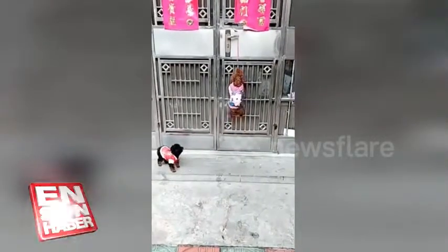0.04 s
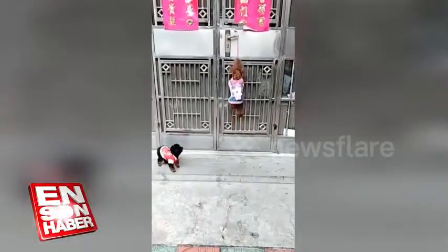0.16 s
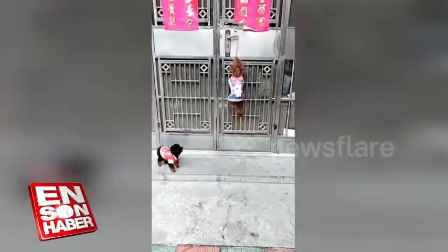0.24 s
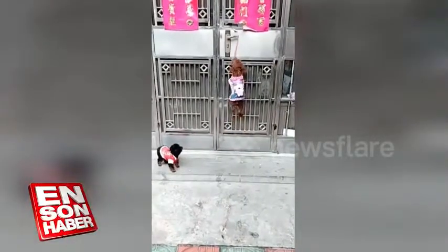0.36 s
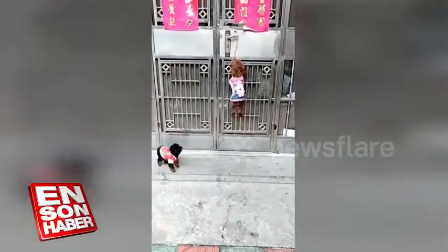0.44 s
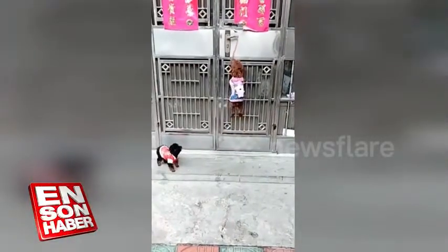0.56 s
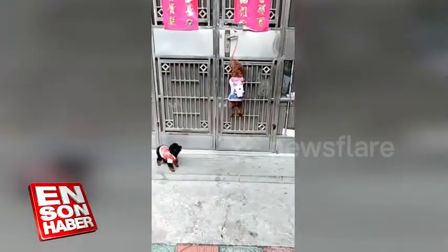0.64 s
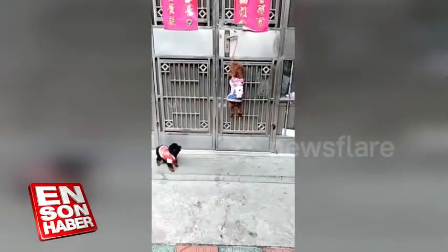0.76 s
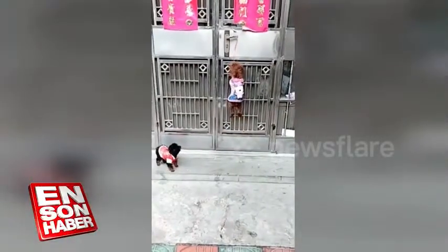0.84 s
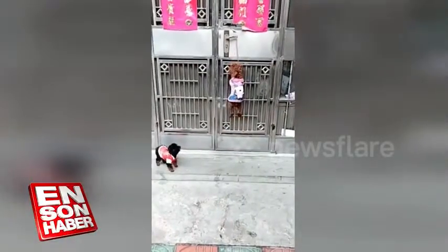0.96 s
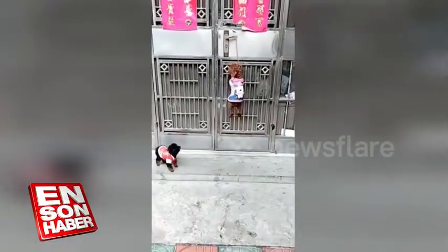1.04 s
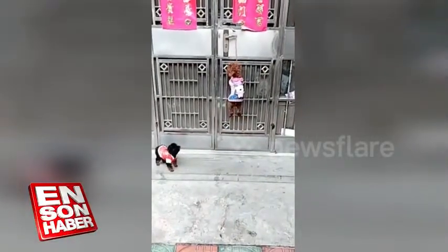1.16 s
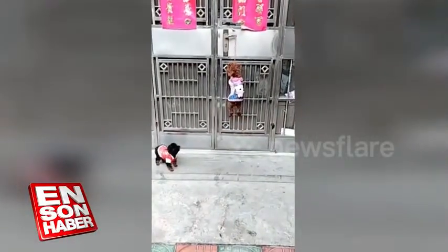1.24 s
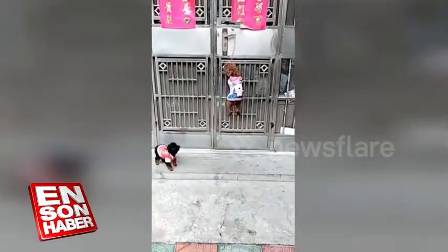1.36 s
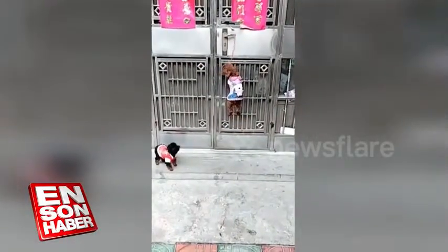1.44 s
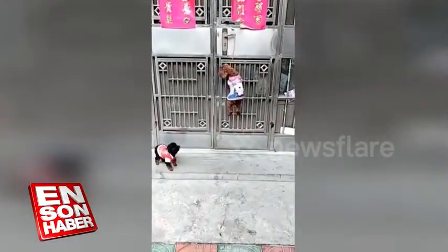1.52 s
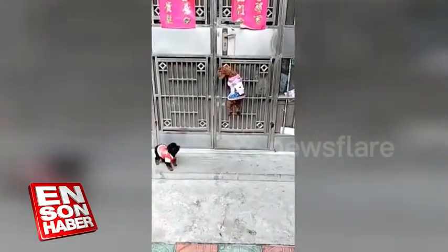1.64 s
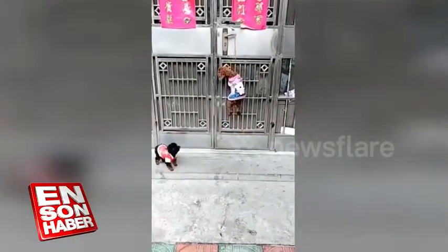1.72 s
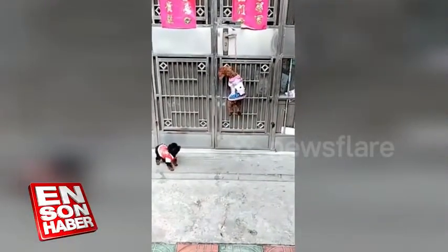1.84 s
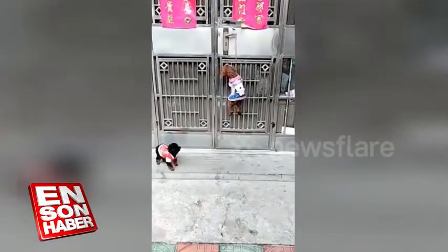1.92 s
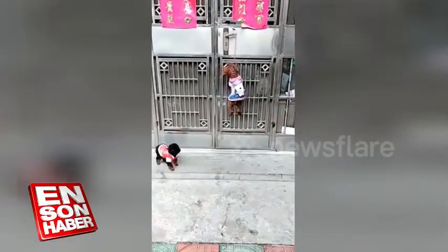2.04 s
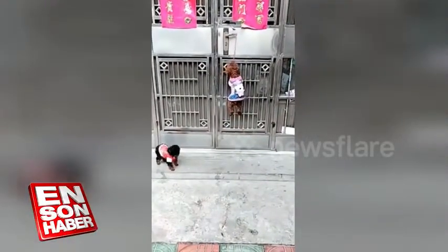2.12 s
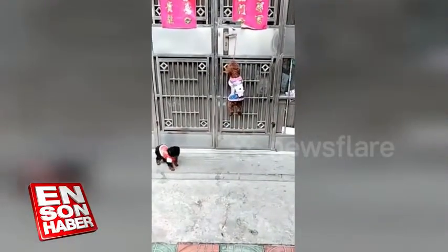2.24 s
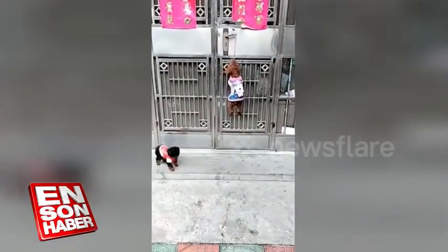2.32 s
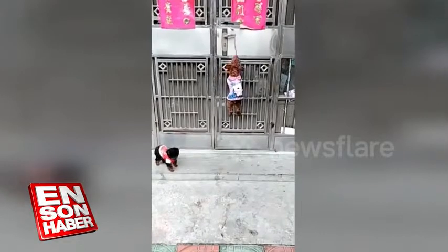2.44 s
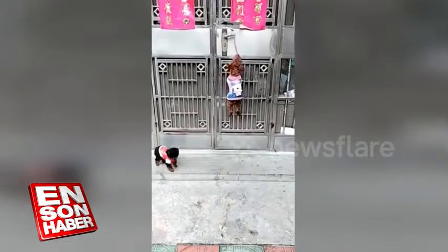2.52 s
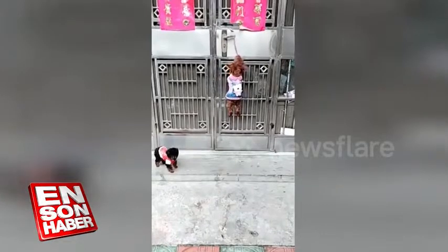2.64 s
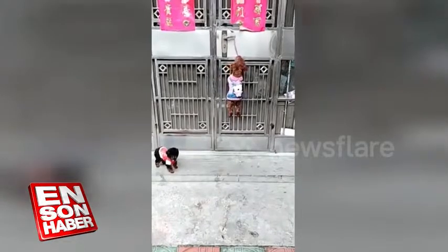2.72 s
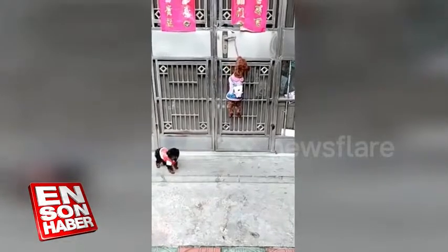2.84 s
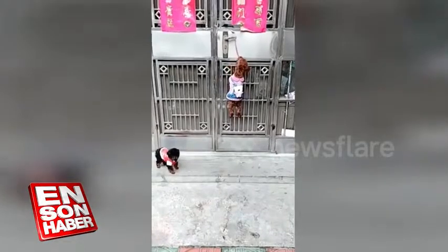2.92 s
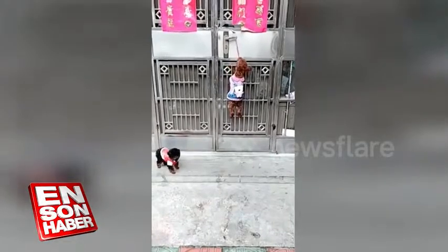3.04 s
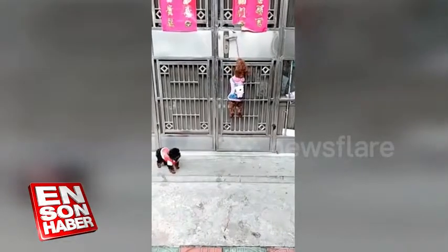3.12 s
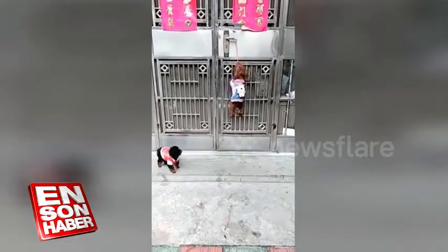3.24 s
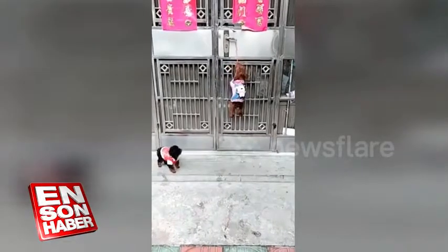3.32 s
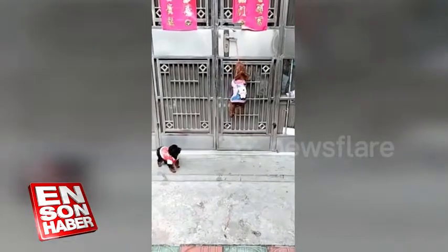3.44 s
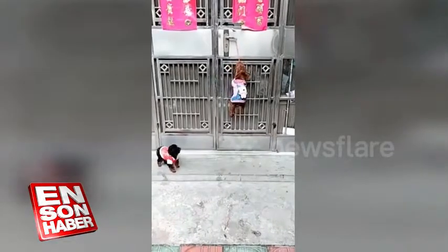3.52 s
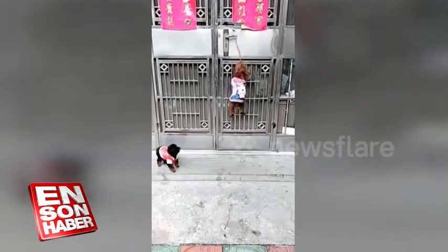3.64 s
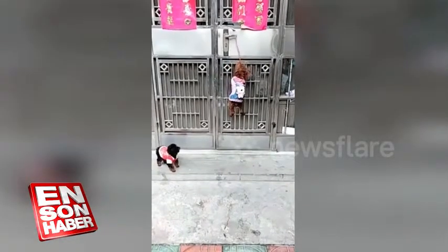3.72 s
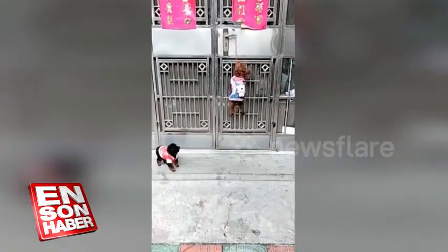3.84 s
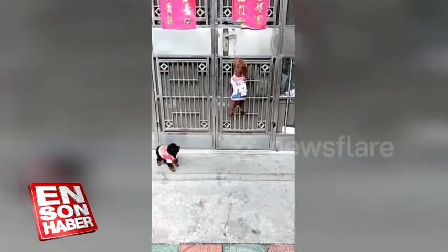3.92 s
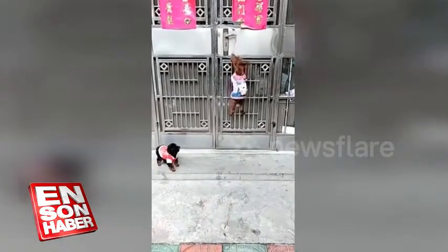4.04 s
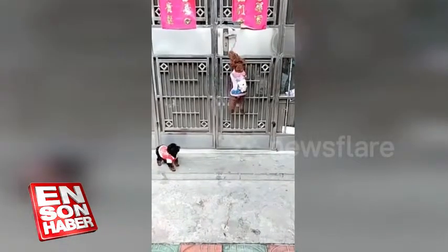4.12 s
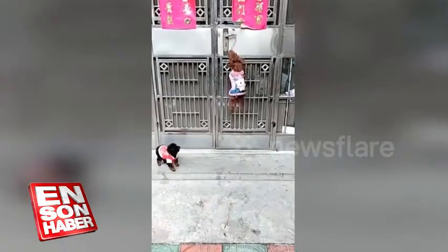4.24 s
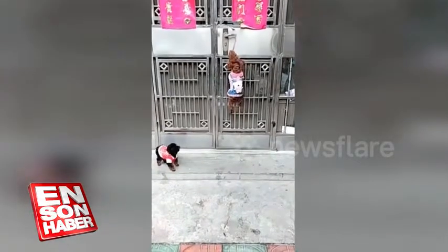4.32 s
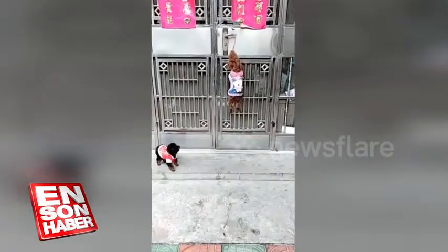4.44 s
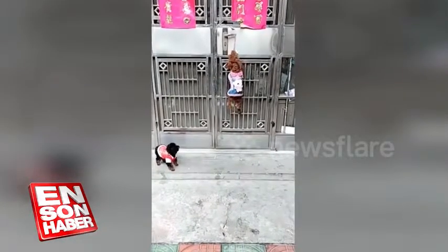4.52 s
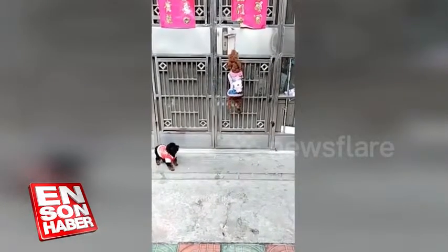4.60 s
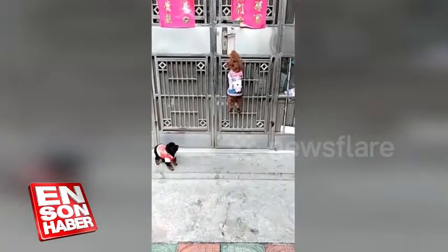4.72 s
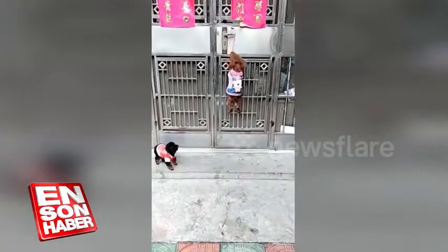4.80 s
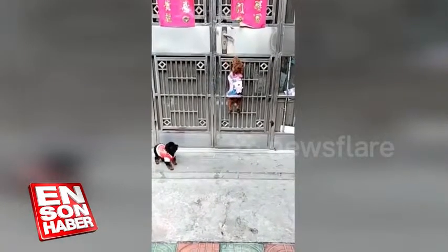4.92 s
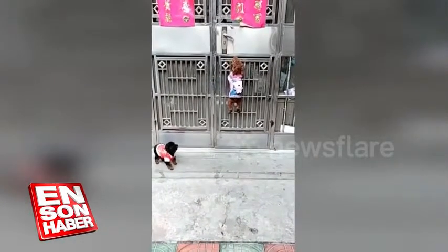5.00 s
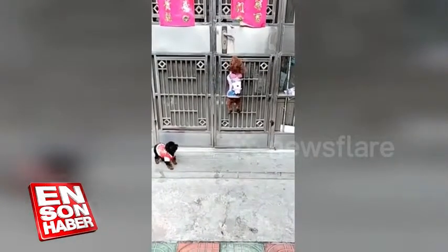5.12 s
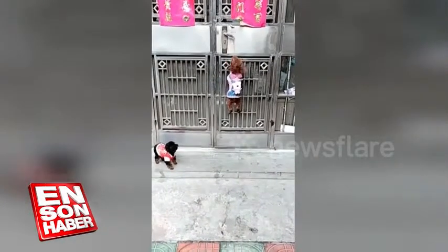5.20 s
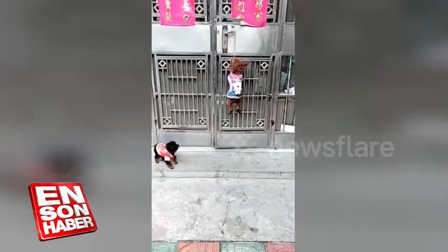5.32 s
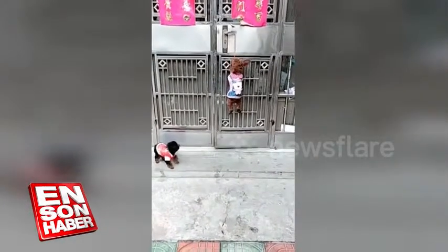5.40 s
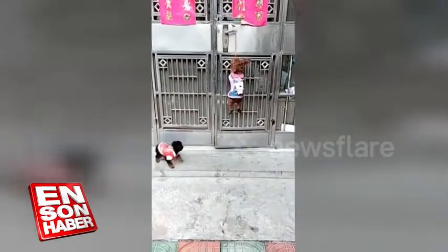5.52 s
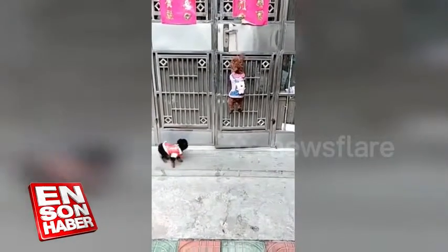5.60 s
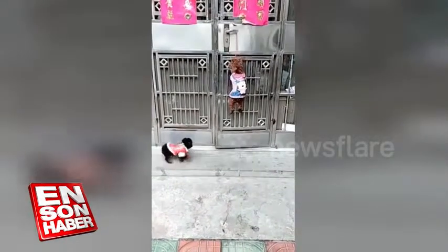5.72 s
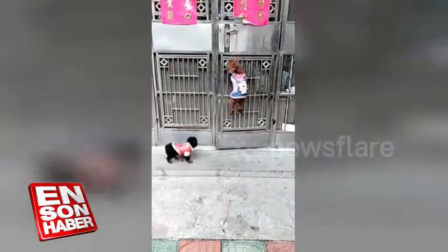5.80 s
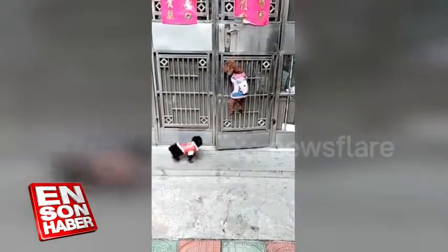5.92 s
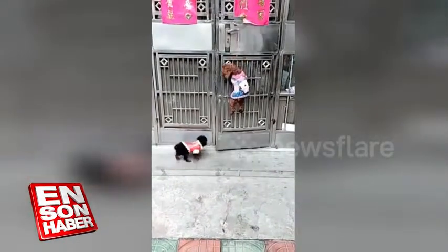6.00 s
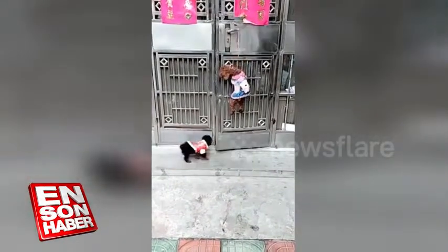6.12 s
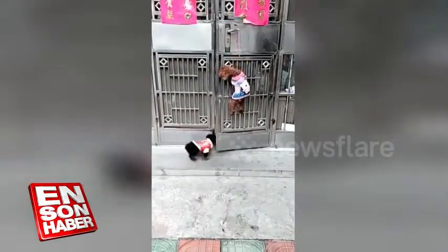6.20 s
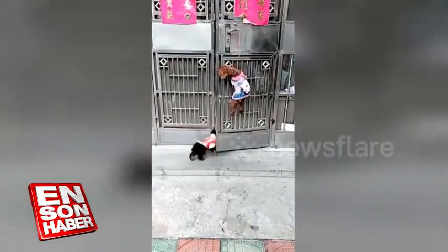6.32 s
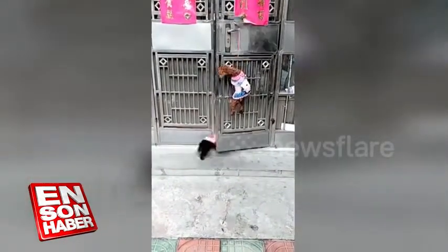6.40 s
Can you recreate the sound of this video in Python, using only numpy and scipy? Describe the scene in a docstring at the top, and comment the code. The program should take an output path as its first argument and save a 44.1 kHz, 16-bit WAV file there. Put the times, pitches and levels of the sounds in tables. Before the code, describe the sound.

A small dog's claws scrape a metal gate, which knocks and rattles, then its handle squeaks and the bolt snaps free.

```python
"""A small dog climbs a steel yard gate and works its latch, some metres away, over a far town rumble.
First its claws scrape along the bars and knocks set the frame ringing; the yard walls add a short echo.
At 2.3 s a harder blow makes the bolt tick and ping, and lighter scrapes and taps follow.
Near 5.5 s the turning handle catches and slips in short squeaks.
At 6.1 s the bolt snaps free with the loudest crack, and one last scrape dies away."""
import sys
import numpy as np
from scipy import signal
from scipy.fft import rfft, irfft
from scipy.io import wavfile
from scipy.ndimage import uniform_filter1d

SR = 44100
rng = np.random.default_rng(int(sys.argv[2]) if len(sys.argv) > 2 else 0)


def to_wav(sig):
    """Store sig (one row per channel, or 1-D mono) as 16-bit WAV at the path in sys.argv[1].

    Samples outside -1..1 are clipped; the rate is SR.
    """
    pcm = np.clip(np.atleast_2d(sig), -1, 1) * 32767
    pcm = np.round(pcm).astype(np.int16)
    wavfile.write(sys.argv[1], SR, pcm.T)  # frames by channels


N = 284834

# Strokes of paw or bolt along the bars; a row that ends before it starts is silent.
# Columns: start_s, fastest_s, end_s, bars_db, claw_low_db, claw_middle_db, claw_top_db, bars_pitch_hz
STROKES = [(0.095, 0.16, 0.25, -52, -59, -62.5, -65, 1210),
           (0.18, 0.235, 0.27, -56, -51.5, -53.5, -60, 1340),
           (0.247, 0.3, 0.33, -54, -61, -66, -67.5, 1210),
           (0.343, 0.428, 0.49, -69.5, -71.5, -77, -80.5, 1140),
           (0.513, 0.57, 0.65, -66.5, -66.5, -73, -81, 1680),
           (0.625, 0.666, 0.71, -66.5, -68.5, -73, -81, 1690),
           (0.716, 0.764, 0.78, -66, -64.5, -74, -80, 1700), (0.833, 0.89, 0.89, -73, -75, -83, -81, 1480),
           (2.906, 2.96, 3, -68, -69.5, -70.5, -76, 1160),
           (2.983, 2.995, 3.05, -64.5, -67.5, -65.5, -71, 1140),
           (3.068, 3.12, 3.3, -71, -74.5, -75.5, -79, 990), (3.256, 3.27, 3.29, -72, -76, -80, -80, 1500),
           (3.289, 3.31, 3.322, -64.5, -67, -72, -74, 1890), (3.695, 3.733, 3.75, -61, -72, -70, -72, 1160),
           (3.745, 3.777, 3.774, -55, -62.5, -72, -61, 1100), (3.785, 3.79, 3.75, -63, -65, -69, -68, 1410),
           (4.07, 4.094, 3.97, -95, -95, -73, -79, 1060), (4.094, 4.13, 4.135, -95, -95, -71, -77, 1060),
           (4.191, 4.204, 4.48, -89, -83, -82, -81, 1090), (5.398, 5.42, 5.47, -72.5, -73, -76, -82, 1280),
           (5.462, 5.518, 5.68, -61, -68, -68, -64.5, 1500), (5.54, 5.556, 5.71, -64, -76, -75, -65, 1940),
           (5.571, 5.645, 5.63, -63, -62.5, -56.5, -56.5, 2100),
           (5.63, 5.668, 5.89, -71, -66, -80, -73.5, 1810), (6.33, 6.394, 6.64, -68, -73, -62, -76, 1230),
           (6.403, 6.419, 6.2, -73, -72, -63, -70, 1270)]


def undb(db):
    """Turn decibels into a number to multiply by."""
    return 10 ** (np.asarray(db) / 20)


def unit(x):
    """Scale a sound to an average (rms) level of 1."""
    return x / np.sqrt(np.mean(x ** 2))


def colour(x, points):
    """Shape the tone of a sound to follow (pitch_hz, level_db) points."""
    hz, db = np.transpose(points)
    size = 4096
    curve_db = np.interp(np.log(np.fft.rfftfreq(size, 1 / SR) + 1), np.log(hz), db)
    cepstrum = irfft(curve_db * np.log(10) / 20)
    # fold it so that the filter never sounds before its input
    cepstrum[1:size // 2] *= 2
    cepstrum[size // 2 + 1:] = 0
    return signal.fftconvolve(x, irfft(np.exp(rfft(cepstrum))))[:len(x)]


def ring(x, hz, fade_s):
    """One ringing note of steel: each push starts a pure tone that drops 60 dB in fade_s."""
    decay = np.exp(-np.log(1000) / (fade_s * SR))
    angle = 2 * np.pi * hz / SR
    return signal.lfilter([0, np.sin(angle)], [1, -2 * decay * np.cos(angle), decay * decay], x)


def wobble(rate_hz):
    """A smooth random curve that heads for a new value rate_hz times a second."""
    hold = int(SR / rate_hz)
    steps = np.repeat(rng.standard_normal(N // hold + 1), hold)
    return uniform_filter1d(uniform_filter1d(steps, hold), hold)[:N]


def town():
    """The far town rumbles and hisses; its middle pitches swell slowly and its bass wavers."""
    # Tone of the town: pitch_hz, level_db
    town_tone = [(15, -26), (25, -2), (38, -12.5), (59, 4), (81, -8), (115, -5), (167, -17.5), (271, -17.5),
                 (529, -25), (1390, -29), (2430, -34), (2930, -32), (4620, -35.5), (12100, -40.5),
                 (15000, -59)]
    # Rise and fall of the middle pitches, used relative to its average: time_s, level_db
    swell_points = [(0.0, -60.5), (0.3, -68.5), (1.06, -69.5), (1.75, -69.5), (2.15, -66.5), (2.3, -67),
                    (2.66, -67), (3.5, -67), (4.01, -66), (4.7, -66), (5.4, -67.5), (6.46, -63.5)]
    noise = undb(-65) * unit(colour(rng.standard_normal(N), town_tone))
    bass = signal.sosfiltfilt(signal.butter(2, 140, fs=SR, output="sos"), noise)
    middle = signal.sosfiltfilt(signal.butter(1, 2000, fs=SR, output="sos"), noise - bass)
    treble = noise - bass - middle
    time_s, level_db = np.transpose(swell_points)
    swell_db = np.interp(np.arange(N) / SR, time_s, level_db - level_db.mean())
    return undb(2 * wobble(15)) * bass + undb(6.5 + swell_db) * middle + treble


def friction(flicker_db):
    """Rubbing surfaces stick and slip: dense clicks of uneven size, in fits and starts."""
    return unit(rng.standard_normal(N) * undb(2 * rng.exponential(size=N) + flicker_db * wobble(120)))


def stroke_loudness(column, slow_drop_db):
    """Each stroke touches, gets louder as it speeds up, then slows and lifts off."""
    touch_s, lift_s = 0.014, 0.014
    out = np.zeros(N)
    for row in STROKES:
        start, fastest, end = row[:3]
        span = slice(int(start * SR), min(int((end + lift_s) * SR), N))
        t = np.arange(span.start, span.stop) / SR
        contact = np.clip(np.minimum((t - start) / touch_s, 1 + (end - t) / lift_s), 0, 1)
        slowness = np.interp(t, [start, fastest, end], [1, 0, 1])
        out[span] = np.hypot(out[span], contact * undb(row[column] - slow_drop_db * slowness))
    return out


def claws():
    """Claws and fur rasp along the bars; harder contact reaches the highest treble."""
    # Tone of the rasp: pitch_hz, level_db
    claw_tone = [(1350, -50), (2300, 6), (4270, 3), (6180, 2), (11700, -8), (13400, -9), (14400, -29),
                 (15000, -53)]
    out = np.zeros(N)
    for column, band_hz in ((4, (1000, 4500)), (5, (4500, 8500)), (6, (8500, 16000))):
        rasp = colour(friction(flicker_db=1.8), claw_tone)
        rasp = signal.sosfilt(signal.butter(3, band_hz, "bandpass", fs=SR, output="sos"), rasp)
        out += stroke_loudness(column, slow_drop_db=7) * unit(rasp)
    return out


def rubbed_bars(notes):
    """A rubbing paw mostly sounds the bars it touches, and halves the time they ring."""
    clicks = friction(flicker_db=2.2)
    fastest_s, pitch_hz = np.transpose(STROKES)[[1, 7]]
    touched_hz = np.interp(np.arange(N) / SR, fastest_s, pitch_hz)
    out = np.zeros(N)
    for hz, db, fade_s in notes:
        touch_db = np.maximum(-19 * np.abs(np.log2(hz / touched_hz)), -30)
        out += undb(db + touch_db) * unit(ring(clicks, hz, fade_s / 2))
    return stroke_loudness(column=3, slow_drop_db=4) * unit(out)


def knocks():
    """Each blow shakes bars and panels: a cluster of nearby tones that swells and quickly dies."""
    # Blows on the gate: start_s, peak_db, pitch_hz, spread_octaves, rise_ms
    blows = [(0.1035, -37.5, 720, 0.13, 2.6), (0.102, -51, 1637, .12, 5.6), (0.105, -50, 443, 0.13, 2.2),
             (0.122, -50, 1520, 0.12, 3.4), (0.128, -46, 740, 0.45, 1.9), (0.136, -52, 945, 0.085, 6.5),
             (0.149, -49.5, 1417, 0.11, 6.7), (0.156, -52, 112, 0.072, 14), (0.165, -49, 1376, 0.081, 6),
             (0.19, -46, 1112, 0.088, 8.7), (0.18, -48.5, 753, 0.16, 4.5), (0.2045, -35, 1140, 0.55, 1.9),
             (0.207, -46.5, 1880, 0.091, 4.6), (0.21, -47, 1100, 0.11, 3.1),
             (0.245, -44.5, 111.4, 0.076, 23), (0.266, -36.5, 900, 1.23, 0.92),
             (0.2851, -37, 1130, 0.4, 1.3), (0.301, -51, 1680, 0.051, 5.5), (0.318, -45.5, 333, 0.38, 2),
             (0.326, -40, 260, 0.2, 1.9), (0.367, -55, 400, 0.42, 2.8), (0.376, -46.5, 255, 0.32, 3),
             (0.432, -56, 870, 0.17, 3.9), (2.325, -46, 960, 0.54, 1.8), (2.329, -36.5, 580, 0.49, 2.9),
             (2.334, -24.5, 2246, 0.58, 3.2), (2.341, -27.5, 2400, 0.72, 1.8),
             (2.338, -46.5, 233, 0.35, 3.9), (2.351, -52.5, 109, 0.087, 38),
             (2.363, -30.5, 610, 0.45, 1.46), (2.368, -46, 292.4, 0.24, 5.8), (2.375, -54, 1530, 0.6, 1.9),
             (2.385, -43, 464, 0.14, 1.6), (2.397, -56, 714, 0.43, 2.7), (2.42, -47.5, 456, 0.38, 2.9),
             (2.634, -51, 766, 0.99, 1.74), (2.721, -55, 590, 0.51, 2.5), (2.921, -57.5, 624, 0.69, 4.7),
             (3.115, -57.5, 460, 0.42, 5), (3.151, -54.5, 592, 0.88, 3.8), (3.303, -54.5, 2104, 0.41, 6),
             (3.437, -49, 787, 1.02, 2.6), (3.768, -58, 1118, 0.08, 6), (3.773, -49.5, 420, 0.44, 4.4),
             (3.891, -52, 1470, 0.81, 3.9), (3.971, -56, 270, 0.44, 13.4), (4.012, -45, 1390, 0.5, 1.8),
             (4.015, -45.5, 807, 0.41, 2.1), (4.035, -51, 1285, 0.48, 3.4), (4.0417, -45.5, 595, 0.52, 1.6),
             (4.048, -53, 322, 0.35, 2.5), (4.059, -55, 170, 0.5, 3.2), (4.704, -63, 1910, .2, 4.9),
             (4.719, -54.5, 1930, 0.32, 4.5), (4.944, -58, 1957, 0.28, 15.6), (5.245, -61, 984, 0.64, 16),
             (5.725, -42.5, 1270, 0.2, 4), (5.734, -44, 1412, 0.075, 4), (5.734, -32, 1137, 0.083, 2.9),
             (5.748, -45, 860, 0.28, 1.2), (5.76, -43, 473, 0.27, 2), (5.77, -46.5, 346, 0.5, 1.2),
             (5.81, -36.5, 980, 0.38, 1.7), (5.813, -38, 520, 0.67, 1), (5.82, -46.5, 405, .5, 4.2),
             (5.827, -59, 744, 0.38, 3.2), (6.1311, -16, 1120, 0.09, 1.1), (6.1324, -25.5, 480, 0.29, 1.6),
             (6.133, -31, 2050, 0.68, 4.6), (6.14, -27, 1367, 0.092, 2.9), (6.134, -57, 107.6, 0.087, 28),
             (6.142, -37, 420, 0.27, 0.91), (6.151, -35, 500, 0.25, 2.8), (6.158, -41.5, 398, 0.057, 8.1),
             (6.15, -42, 1150, 0.25, 2.3), (6.163, -37, 1180, 0.49, 2), (6.169, -34.5, 1454, 0.19, 3.0),
             (6.178, -53, 1160, .4, 3.0), (6.192, -37, 1020, 0.81, 3.0), (6.202, -38.5, 1100, 0.26, 1.6),
             (6.257, -35.5, 1314, 0.15, 2), (6.258, -36, 630, 0.34, 1.5), (6.262, -44, 1114, 0.066, 5.3),
             (6.269, -36, 740, 0.63, 1.1)]
    out, t = np.zeros(N + SR), np.arange(SR // 5) / SR
    steps = np.linspace(-1.6, 1.6, num=23)[:, None]
    chance = rng.random((len(blows), 2, len(steps), 1))
    for (start_s, db, hz, spread, rise_ms), (jitter, phase) in zip(blows, chance):
        offset = steps + 0.14 * (jitter - .5)
        tones_hz = hz * 2 ** (spread * offset)
        tones = np.exp(-offset ** 2 / 2) * np.sin(2 * np.pi * (tones_hz * t + phase))
        age = t / (rise_ms / 1000)
        blow = (age * np.exp(1 - age)) ** 1.04 * tones.sum(axis=0)
        start = int(start_s * SR)
        out[start:start + len(t)] += undb(db) * blow / np.abs(blow).max()
    return out[:N]


def loose_bars(blows):
    """Loose bars clatter on after a blow: uneven clicks that fade as its energy drains."""
    fade_s, band_hz = 0.28, (303, 2780)
    decay = np.exp(-2 * np.log(1000) / (fade_s * SR))
    energy = signal.lfilter([np.sqrt(1 - decay)], [1, -decay], blows ** 2)
    clicks = rng.standard_normal(N) * undb(1.5 * rng.exponential(size=N) + 4 * wobble(150))
    clatter = signal.sosfilt(signal.butter(2, band_hz, "bandpass", fs=SR, output="sos"), clicks)
    return undb(-28.5) * np.sqrt(energy) * unit(clatter)


def frame():
    """Knocks, clatter and rubbing set the gate's frame ringing at its own notes."""
    # Notes of the frame and panels: pitch_hz, level_db, fade_s
    frame_notes = [(109.5, -7.5, 0.72), (271, 5, 0.49), (340.7, -5, 0.34), (400, 2.5, 0.23),
                   (436, -7, 0.12), (471.5, 9, 0.28), (530, 12.5, 0.11), (584, 8, 0.03), (660, 2.5, 0.12),
                   (763, 18, 0.042), (870, 7.5, 0.12), (968, 3.5, 0.056), (1030, -19, 0.087),
                   (1125, -3, 0.077), (1121, 12, 0.11), (1213, 3, 0.054), (1330, -20, 0.12),
                   (1405, 9.5, 0.11), (1428, 4, 0.1), (1543, 9, 0.084), (1665, 13.5, 0.05),
                   (1853, 10, 0.038), (2080, 12.5, 0.054), (2399, 10.5, 0.097)]
    blows = knocks()
    rubbing = rubbed_bars(frame_notes)
    clatter = loose_bars(blows)
    shaking = blows + undb(5.5) * clatter
    ringing = sum(undb(db) * ring(shaking, hz, fade_s) for hz, db, fade_s in frame_notes)
    return blows + clatter + undb(-62.5) * ringing + rubbing


def yard_echo(x):
    """The yard walls send back a short tail of echoes, duller than the direct sound."""
    rise_s, fade_s, cutoff_hz = 0.0011, 0.27, 3200
    t = np.arange(SR // 2) / SR
    shape = np.exp(-np.log(1000) * t / fade_s) * (1 - np.exp(-t / rise_s))
    tail = signal.lfilter(*signal.butter(1, cutoff_hz, fs=SR), shape * rng.standard_normal(len(t)))
    return undb(-15.5) * signal.fftconvolve(x, tail / np.sqrt(np.sum(tail ** 2)))[:N]


def rattle(start_s, level_db, looseness, fade_s):
    """Each contact is one sharp click, then a dying chatter of loose parts."""
    out, t = np.zeros(N + SR), np.arange(SR // 4) / SR
    for at, gain, chatter, fade in np.broadcast(start_s, undb(level_db), looseness, fade_s):
        burst = chatter * rng.standard_normal(len(t)) * np.exp(-np.log(1000) * t / fade)
        burst[0] = 1
        out[int(at * SR):int(at * SR) + len(t)] += gain * burst
    return out[:N]


def ticks():
    """Bolt, handle and claws hit steel with bright cracks; looser parts chatter longer."""
    # Sharp contacts: start_s, level_db, looseness (0-1), low_boost_db, top_boost_db
    contacts = [(0.126, -59, 0.2, 0, -1), (2.324, -54, 0.2, 10, 0), (2.336, -33, 0, 13, 6),
                (2.337, -46, 0.3, 18, -2), (2.3395, -48, 0.23, 11, -4), (2.34, -46, 0.4, 12, -6),
                (2.361, -34, 0.15, 8, 5), (2.362, -37, 0, 9, -4), (2.375, -49, 0.24, 2, -4),
                (2.39, -67, 0.67, 8, -4), (2.414, -63.5, 0.74, 10, -8), (3.001, -37.5, 0.09, 4.5, -9),
                (3.016, -47, 0.12, -10, -6), (3.097, -57, 0.22, -8, 3), (3.436, -52, 0.1, 7, -14),
                (3.762, -57, 0.92, -4, -3), (3.892, -50, 0.19, 5.5, 7.5), (4.02, -68.5, 0.68, -13, 2),
                (4.745, -56, 0.14, -7, -2), (4.943, -64, 0.36, 5, 5), (4.96, -68.5, 0.53, 10, 3),
                (5.732, -62, 0.5, 3, 2), (5.738, -47, 0.3, -6, -3), (5.743, -43, 0.4, -6, 8),
                (5.748, -44, 0.45, -6, 3), (5.755, -52, 0.2, -6, 8), (5.81, -23, 0.08, 3, 5.5),
                (5.813, -47.5, 0.38, 8, -2), (6.1297, -7.5, 0.09, 3, -6.5), (6.133, -34, 0.42, -4, -4),
                (6.1506, -13, 0.08, -15, -8), (6.161, -27.5, 0.19, -1, -2), (6.166, -32, 0.08, -1, -1)]
    # Tone of a tick: pitch_hz, level_db
    tick_tone = [(1180, -2), (2000, -4.5), (2350, -9), (4380, -5.5), (4770, -6), (5880, -7), (8110, -3),
                 (9920, -8.5), (12100, -10), (13600, -16), (15000, -35)]
    start_s, level_db, looseness, low_db, top_db = np.transpose(contacts)
    out = np.zeros(N)
    for band_hz, boost_db in (((1500, 4800), low_db), ((4800, 9500), 0), ((9500, 15000), top_db)):
        cracks = rattle(start_s, level_db + boost_db, looseness, fade_s=0.0075 + 0.14 * looseness)
        band = signal.butter(2, band_hz, "bandpass", fs=SR)
        out += signal.lfilter(*band, colour(cracks, tick_tone))
    return undb(13) * out


def bolt_pings():
    """Steel hits the loose bolt, which rings unevenly; the spot it lands on picks the notes."""
    # Notes of the bolt and handle: pitch_hz, level_db, fade_s
    bolt_notes = [(4360, -6, .05), (5150, -3, .045), (5900, -3, .07), (6900, 0, .09), (8140, -5, .05),
                  (10550, 0, .08), (11900, -4, .17), (12900, 0, .065)]
    # Hits on the bolt: start_s, level_db, pitch_hz (the pitch that spot rings best)
    hits = [(2.335, -39.5, 12900), (2.342, -49, 12900), (2.338, -59, 6900), (2.335, -45, 10550),
            (2.337, -38, 5100), (2.341, -46, 4360), (4.944, -57, 5150), (5.743, -50, 10550),
            (5.746, -52, 8140), (5.749, -51, 6900), (5.756, -56, 10550), (5.81, -56, 11300),
            (6.131, -42, 11900), (6.132, -49, 10550), (6.14, -44, 11900), (6.16, -52, 11900),
            (6.151, -39, 5900), (6.16, -42, 4360), (6.16, -53, 8000)]
    start_s, level_db, spot_hz = np.transpose(hits)
    out = np.zeros(N)
    for hz, note_db, fade_s in bolt_notes:
        reach_db = -110 * np.abs(np.log2(hz / spot_hz))
        flutter_db = 2.5 * wobble(200)
        taps = rattle(start_s, level_db + reach_db, looseness=0.03, fade_s=0.013)
        out += undb(note_db + flutter_db) * ring(taps, hz, fade_s)
    return out


def handle_squeaks():
    """The turning handle catches and lets go: short, rough squeaks at one pitch or another."""
    # Squeaks of the handle: start_s, length_ms, pitch_hz, level_db
    squeaks = [(5.484, 14, 1380, -58.5), (5.498, 26, 2200, -61), (5.506, 24, 1416, -56),
               (5.533, 17, 1420, -59), (5.545, 22, 2210, -65), (5.556, 27, 1398, -55),
               (5.568, 13, 727, -54.5), (5.585, 17, 2050, -60), (5.59, 16, 1420, -57),
               (5.608, 10, 2850, -62), (5.612, 19, 1095, -56.5), (5.632, 14, 1350, -60),
               (5.636, 12, 2140, -61), (5.648, 24, 2430, -58), (5.656, 22, 2010, -60),
               (5.67, 16, 1190, -59.5), (5.68, 28, 1380, -61), (5.688, 27, 2014, -64)]
    waver = 1 + 0.023 * wobble(400)
    flicker = undb(3.5 * wobble(300))
    out = np.zeros(N)
    for start_s, length_ms, hz, db in squeaks:
        span = slice(int(start_s * SR), int((start_s + length_ms / 1000) * SR))
        tone = np.sin(2 * np.pi * hz * np.cumsum(waver[span]) / SR)
        out[span] += undb(db) * np.sqrt(np.hanning(len(tone))) * flicker[span] * tone
    return out


def scene():
    """Mix the gate, its echo and the town into one channel."""
    gate = frame() + ticks() + bolt_pings() + claws() + handle_squeaks()
    return (gate + yard_echo(gate) + town())[None]


def record(dry):
    """The phone cuts off the highest treble."""
    cutoff_hz = 15100
    return signal.sosfilt(signal.ellip(8, .2, 70, cutoff_hz, fs=SR, output="sos"), dry)


dry = scene()
out = record(dry)
to_wav(out)
```